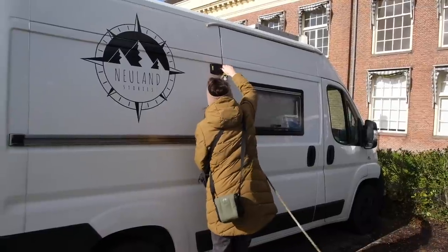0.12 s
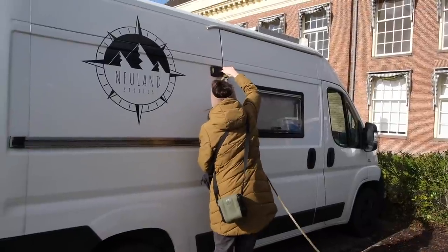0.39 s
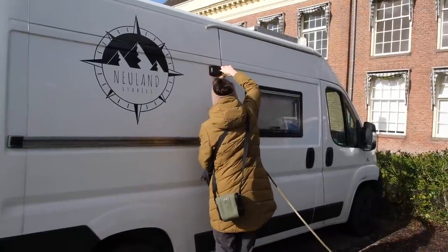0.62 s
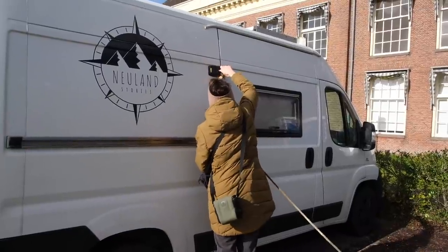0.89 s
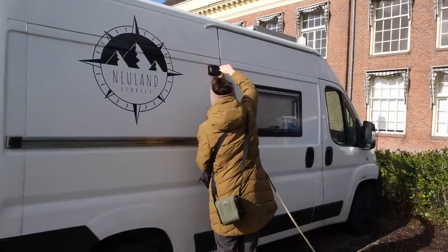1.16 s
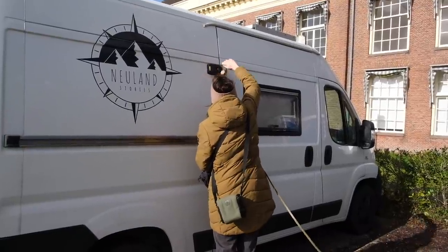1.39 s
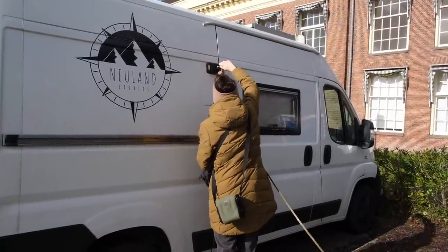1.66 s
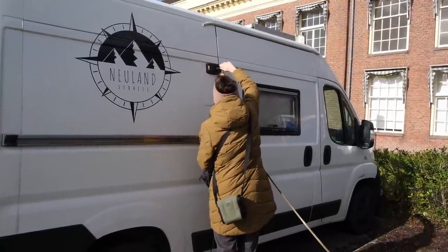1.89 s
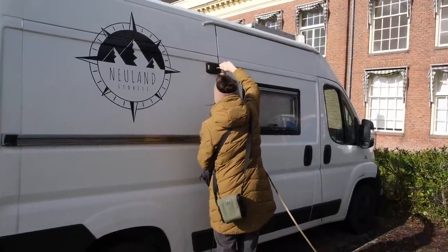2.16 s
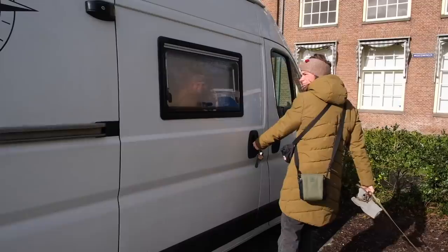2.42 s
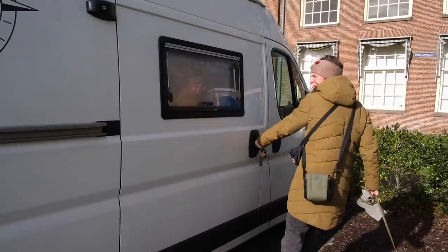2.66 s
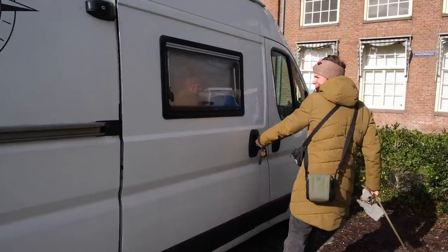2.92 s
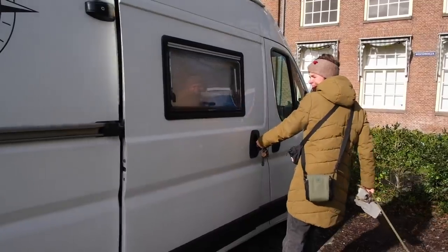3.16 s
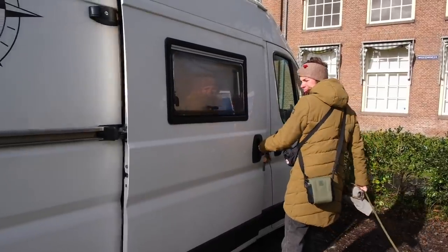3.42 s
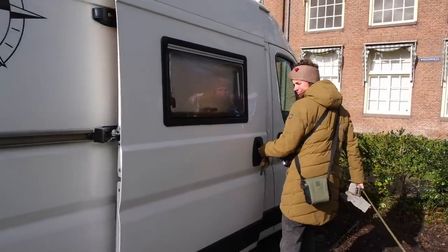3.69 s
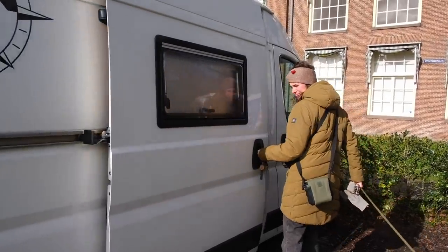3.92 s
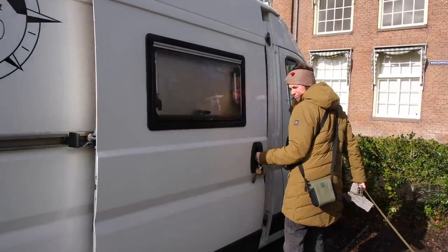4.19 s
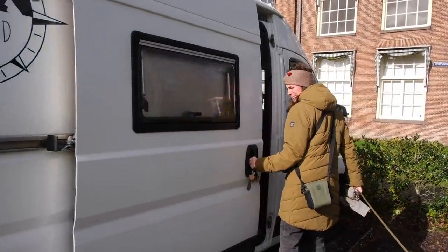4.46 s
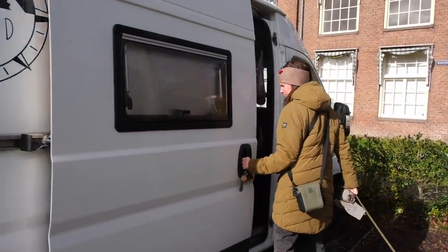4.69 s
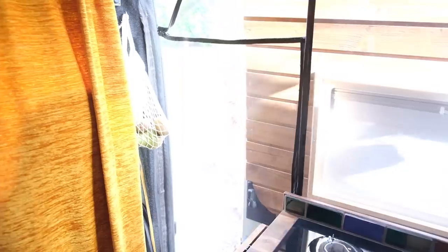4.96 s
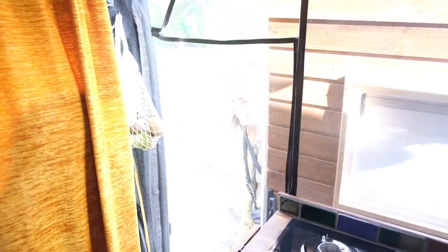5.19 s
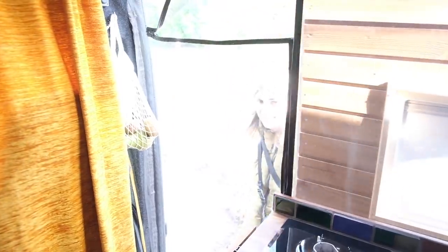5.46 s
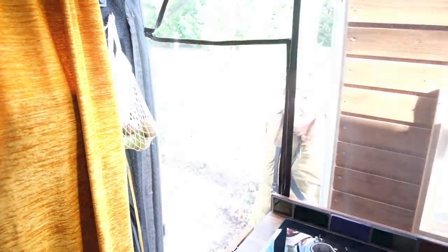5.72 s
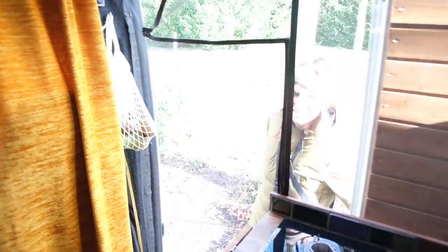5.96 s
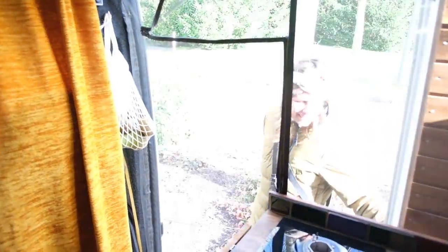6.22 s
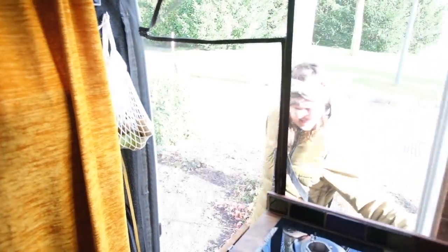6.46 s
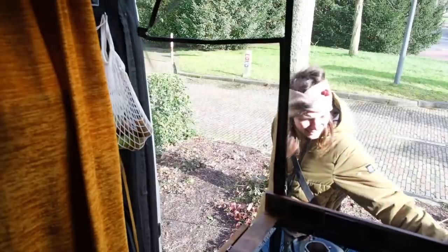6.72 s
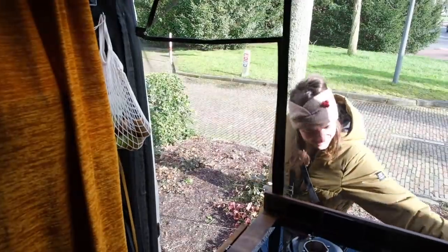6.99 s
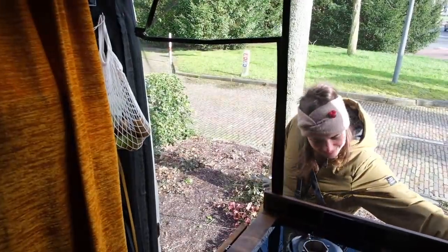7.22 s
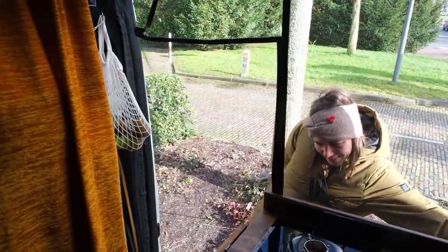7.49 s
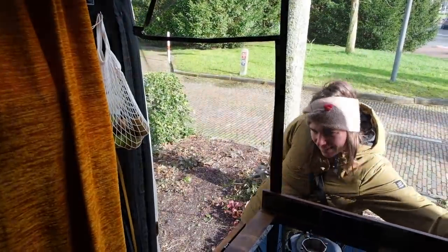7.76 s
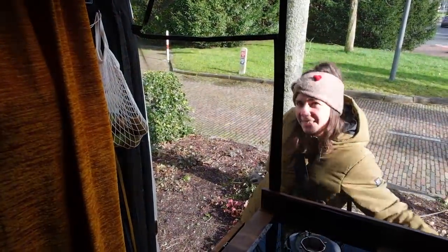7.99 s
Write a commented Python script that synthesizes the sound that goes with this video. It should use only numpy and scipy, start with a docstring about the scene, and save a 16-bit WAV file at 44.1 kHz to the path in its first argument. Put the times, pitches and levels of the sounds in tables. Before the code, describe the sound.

Close, wind-overloaded outdoor sound: low heaves, blunt pops, a buzzing small motor approaching and dry clicks. Abruptly the motor stops, wind continues, and a very sharp van latch cracks with a short rattle and panel thuds. A tiny gap of silence leads to a sheltered interior, where a sliding door rolls with lumpy bass rumble, fades, and ends in clustered rattly knocks, leaving quiet air and cloth rustle.

```python
"""Beside and then inside a camper van. Outside, in two passages, gusts and pops of wind push the microphone;
a small engine, summed from wavering orders, drives by in the first, over a street of coloured noise.
Overload clicks and ringing key modes dot the wind, chirps fall softly, and the sliding door's latch snaps
free as struck modes and rattle. After a short silent join, from inside: the door rolls on its rail as a
low noise, slows and knocks into its end catch, its panel modes driven by blows and rattles."""
import sys
import numpy as np
from scipy import signal
from scipy.fft import rfft, irfft
from scipy.io import wavfile
from scipy.ndimage import uniform_filter1d

SR = 44100
rng = np.random.default_rng(int(sys.argv[2]) if len(sys.argv) > 2 else 0)


def waveform_to_disk(signal):
    """Save audio, clipped to [-1, 1], as 16-bit WAV at the path in sys.argv[1]."""
    frames = np.transpose(np.atleast_2d(signal))
    scaled = np.clip(frames, -1, 1) * 32767
    samples = np.round(scaled).astype(np.int16)
    wavfile.write(sys.argv[1], SR, samples)


def how_loud(loudness_db):
    """Turn decibels into a plain amplitude multiplier (0 dB gives 1, 20 dB gives 10)."""
    steps = np.asarray(loudness_db, float) / 20
    return 10 ** steps


N = 358091
TIME = np.arange(N) / SR
JOIN_S = 2.4245  # second outdoor passage begins
SILENCE_START_S, SILENCE_END_S = 4.9178, 4.9577  # silent join; inside from its end

# Wind on the microphone, first and second passage: t/s, heave level/dB, flutter level/dB
FIRST_WIND = [(0.0, -9, -17.5), (0.1, -33, -42), (0.12, -15.5, -38), (0.27, -14.5, -33), (0.33, -10, -41),
              (0.36, -21.5, -39), (0.5, -22, -37), (0.52, -12, -61), (0.55, -25, -48), (0.79, -21.5, -37),
              (0.81, -36, -51), (0.92, -21, -31), (0.93, -25, -37), (1.08, -29, -31), (1.14, -11, -42),
              (1.29, -15.5, -27), (1.42, -17.5, -27), (1.62, -27, -50), (1.66, -8.5, -27),
              (1.7, -11.5, -48), (1.74, -22.5, -39), (1.78, -28, -39.5), (1.83, -14.5, -34),
              (1.85, -21.5, -48), (1.97, -12.5, -26), (2.04, -21, -35.5), (2.35, -15.5, -33),
              (2.42, -21.5, -29.5)]
SECOND_WIND = [(2.43, -10, -37), (2.46, -21, -33), (2.49, -12, -27.5), (2.54, -23, -36), (2.62, -32, -25),
               (2.64, -18.5, -21), (2.83, -16.5, -33.5), (2.85, -20.5, -25.5), (2.96, -23, -24),
               (3.01, -25.5, -61), (3.03, -28, -41.5), (3.14, -15, -24.5), (3.17, -26.5, -31.5),
               (3.25, -18.5, -20.5), (3.28, -15, -45.5), (3.5, -16, -26.5), (3.57, -22.5, -58),
               (3.62, -17.5, -22.5), (3.64, -17, -40.5), (3.71, -16.5, -34.5), (3.82, -20.5, -47),
               (3.85, -13, -32), (3.91, -14, -46), (3.99, -20, -18.5), (4.05, -12.5, -31), (4.08, -23, -37),
               (4.18, -15, -28.5), (4.22, -23, -40), (4.25, -16.5, -34), (4.31, -24.5, -45.5),
               (4.36, -21, -27.5), (4.41, -16.5, -37), (4.43, -20, -24.5), (4.57, -16, -24),
               (4.67, -23, -36), (4.7, -28, -32), (4.74, -12, -23), (4.79, -23, -28.5), (4.85, -20.5, -19),
               (4.92, -28, -26.5)]
# Sharp wind pops on the diaphragm, before flattening: t/s, peak level/dB, push width/ms
WIND_POPS = [(0.903, 1, 3.24), (1.14, -1, 4.8), (1.204, -8.5, 2.1), (1.324, -5, 1.1), (2.852, -13, 1.4),
             (2.872, -3, 1.9), (2.968, -8, 1.83), (3.118, 0.5, 2.96), (3.863, -10.5, 1.3),
             (4.151, -14, 2.6), (4.186, -2, 1.3), (4.25, -6, 2.4), (4.258, -1, 5.2), (4.452, -6, 1.5),
             (4.474, -5.5, 2.3), (4.527, -6, 2.3), (4.573, -1, 1.7)]
# Passing engine: t/s, firing rate f/Hz, then level/dB of the orders 1, 2, 3, 3.5 and 5
ENGINE_PASS = [(0.0, 154.9, -44.5, -36.5, -58, -65, -60), (0.25, 152.4, -29.5, -40.5, -59, -59, -60),
               (0.42, 146, -32, -37, -66, -63, -49), (0.65, 145.5, -38, -34.5, -37.5, -46, -47),
               (0.85, 142.8, -34, -47.5, -37.5, -42, -47), (1.05, 141.5, -29.5, -47, -39, -42, -42),
               (1.25, 141, -34, -48, -33.5, -45, -44.5), (1.38, 138.2, -29, -45, -41.5, -41, -55),
               (1.5, 141.1, -40, -49, -29, -35, -46.5), (1.7, 142.3, -25, -35, -31.5, -37.5, -47),
               (1.9, 145.6, -24, -35, -30.5, -38, -48.5), (2.07, 147.3, -19, -29.5, -29, -36, -46.5),
               (2.25, 149.5, -28.5, -32.5, -28, -34.5, -46), (2.43, 153.8, -30, -31, -29, -42, -44)]
# Further engine orders: multiple of the firing rate, level/dB re third order
HIGH_ORDERS = [(4, -14.5), (6, -21), (7, -26)]
# Colour of tyre roar and town wash: f/Hz, relative density level/dB
STREET_COLOUR = [(150, -20), (250, 6), (490, 2.5), (870, 0), (960, 4), (1100, 1), (1420, -2), (1870, -7.5),
                 (2700, -12), (3600, -19.5), (4100, -22), (4800, -26.5), (5600, -32.5), (7000, -40.5),
                 (10000, -66), (15800, -56)]
# Faint electronic whine: f/Hz, level/dB when the street stands at -38.5 dB
ELECTRONIC_WHINE = [(10009, -79)]
# Sudden drops of the quieter outdoor sounds: t/s, depth level/dB
LEVEL_DIPS = [(0.318, 6), (1.23, 3), (1.26, 5), (1.3, 9.5), (1.35, 6), (1.668, 6), (2.3, 5), (2.71, 7.5),
              (2.76, 11.5), (2.869, 15.5), (3.13, 12), (3.735, 8), (3.851, 17), (4.26, 12), (4.48, 7.5),
              (4.6, 6)]
# Cloth rustles: centre t/s, length t/s, level/dB
CLOTH_RUSTLES = [(0.157, 0.099, -71), (0.67, 0.13, -76.5), (1.64, 0.061, -71), (2.556, 0.11, -76.5),
                 (3.645, 0.14, -70.5), (5.186, 0.2, -73.5), (5.788, .12, -68.5), (7.573, 0.12, -61.5)]
# Small dry clicks, many from wind overloading the microphone, one at the first join: t/s, peak level/dB
DRY_CLICKS = [(0.3232, -41), (1.283, -46.5), (1.3257, -47), (1.365, -41), (1.6538, -39.5), (2.424, -31.5),
              (2.615, -49), (2.632, -52.5), (2.721, -52), (2.741, -48), (2.754, -54.5), (2.872, -43.5),
              (3.116, -46.5), (3.306, -50), (3.837, -44.5), (3.852, -53.5), (3.863, -49), (4.16, -48),
              (4.186, -54), (4.2583, -44.5), (4.412, -53), (4.4707, -51)]
# High pings, mostly of keys, one in the door's end knock: t/s, level/dB before the soft onset,
# ring f/Hz, t60/s
HIGH_PINGS = [(.50, -63, 13040, .08), (1.316, -49, 8960, 0.023), (1.351, -44, 9140, 0.026),
              (1.356, -53, 9500, 0.084), (2.083, -54, 13100, .03), (2.215, -68, 12790, .15),
              (2.25, -68, 12870, .15), (2.29, -62, 12900, 0.19), (2.33, -65, 13100, 0.16),
              (2.365, -64, 12960, .1), (2.703, -56, 5000, 0.068), (4.018, -63, 10450, .2),
              (4.031, -56, 10450, 0.11), (7.532, -28, 5000, 0.046)]
# Blows on the door: t/s, rattle peak level/dB, loudest mode region f/Hz, spread/octaves,
# blow level/dB re rattle, rattle length/ms
DOOR_KNOCKS = [(0.7336, -21.5, 802, 0.26, 12.5, 8.9), (1.819, -39, 3580, 0.36, 0, 3.9),
               (2.7405, -20.5, 650, 0.88, 1, 11), (2.745, -19.5, 523, 0.99, 10, 14),
               (2.7493, -23.5, 402, 0.55, 10, 27), (3.382, -35, 2150, 0.27, 6, 2),
               (3.382, -24, 615, 0.42, 7.5, 4.6), (3.3865, -27.5, 786, 0.36, 6, 4.5),
               (3.45, -24, 810, 1.3, 2, 7.9), (3.454, -27.5, 746, 0.76, 9, 5.7),
               (5.296, -30, 2520, .86, -6.5, 8.7), (7.4214, -25.5, 1020, 0.24, 7, 5),
               (7.422, -48, 2250, 0.11, 14, 5), (7.430, -24, 694, 0.6, -4, 23),
               (7.529, -9, 1000, 2.04, -13, 24), (7.538, -22, 447, 0.43, 8, 10),
               (7.546, -21.5, 254, 0.65, 9.5, 10.6), (7.549, -14, 900, 1.4, -1, 25),
               (7.572, -23, 1080, .35, 1, 19), (7.600, -28, 300, 0.77, 5, 5),
               (7.652, -30.5, 1000, 0.36, -6, 27), (7.661, -26, 240, 0.45, 6.5, 8)]
# Door modes before the lining damps them: f/Hz, relative level/dB, t60/s
DOOR_MODES = [(241, 8, 0.097), (300, -2, 0.072), (397, 0, 0.084), (480, 8, 0.062), (606, 9.5, 0.081),
              (723, 3, 0.046), (880, 6, 0.046), (1000, 4.5, .05), (1064, 4.5, 0.12), (1205, 12, 0.086),
              (1370, 3.5, 0.1), (1633, 8, 0.018), (1778, -4, 0.045), (2230, -9, 0.036), (2590, -5.5, 0.05),
              (3170, -11.5, .02), (3580, -13, 0.015), (4010, -1, 0.02), (5000, -2, 0.015), (5420, -4, .04),
              (6820, 9, .02), (9100, 10, 0.002), (11400, -3, 0.004)]
# Faint distant chirps: t/s, length t/s, starting f/Hz, level/dB before the flutter
SOFT_CHIRPS = [(1.83, .033, 4750, -56), (1.897, .033, 4850, -62), (1.974, 0.064, 4640, -56),
               (2.04, 0.064, 2890, -42.5), (2.05, .033, 4700, -57), (2.129, 0.061, 4800, -57),
               (2.151, 0.05, 2770, -42), (2.159, 0.086, 2580, -47), (2.166, .05, 4130, -56),
               (2.196, 0.085, 3060, -54)]
# Latch bolt modes: f/Hz, relative level/dB, t60/s (2 ms at least when rung)
BOLT_MODES = [(820, 6, 0.0025), (2080, 2, 0.0051), (2470, -8, 0.0058), (3060, -0.5, 0.01),
              (4800, -3.5, 0.0049), (6300, -8, 0.0016), (8740, -7.5, .0015), (11950, -35.5, .0015)]
# Colour of the rattling lock parts: f/Hz, relative density level/dB
LOCK_RATTLE = [(240, -27), (400, -16), (665, 0.5), (1520, -16), (2170, -20), (2380, -9.5), (2820, -21),
               (5470, -23.5), (8030, -47), (10300, -43), (15800, -56)]
# Inside the van: t/s, door rolling level/dB, air level/dB
CABIN_LEVELS = [(4.96, -22.5, -51.5), (5.6, -20, -50), (6.0, -23, -51), (6.74, -27.5, -51.5),
                (7.15, -34.5, -50.5), (7.53, -33.5, -49.5), (7.77, -40.5, -49.5), (8.12, -43, -49.5)]
# Colour of the door panel shaken by the rollers: f/Hz, relative density level/dB
ROLL_COLOUR = [(35, -40), (60, -9.5), (86, -3.5), (113, -9.5), (140, -1), (213, 3), (247, 1.5), (282, 1.5),
               (423, -13.5), (617, -16), (696, -26.5), (1000, -19.5), (1500, -35.5), (1950, -87),
               (3300, -120)]
# Colour of the outdoor air heard from inside: f/Hz, relative density level/dB
AIR_COLOUR = [(9.4, -33.5), (14, 14.5), (26, -16.5), (44, -14), (166, -21.5), (234, -30), (405, -44),
              (468, -22.5), (606, -31.5), (833, -25), (1210, -27), (1480, -33), (2880, -35.5),
              (5760, -56.5), (15800, -76)]


def column(table, k):
    """Column k of a curve at every sample."""
    points = np.array(table)
    return np.interp(TIME, points[:, 0], points[:, k])


def band(x, lo_hz, hi_hz, order=2):
    """Butterworth band-pass."""
    edges = [lo_hz, min(hi_hz, .45 * SR)]
    return signal.sosfilt(signal.butter(order, edges, "bandpass", fs=SR, output="sos"), x)


def unit(x, lo_hz=10, hi_hz=18000):
    """Scale so that the band lo-hi has rms 1."""
    return x / np.std(band(x, lo_hz, hi_hz))


def walk(rate):
    """Random levels held 1 / rate s and slewed twice; spread near 1."""
    k = int(SR / rate)
    held = np.repeat(rng.standard_normal(N // k + 1), k)
    return 1.025 * uniform_filter1d(uniform_filter1d(held, k), k)[:N]


def wash(spectrum, flicker_db, rate):
    """Noise of a given colour whose octaves each flicker in level."""
    hz = np.fft.rfftfreq(N, 1 / SR) + 1e-3
    table = np.array(spectrum)
    colour_db = np.interp(np.log(hz), np.log(table[:, 0]), table[:, 1])
    full = rfft(rng.standard_normal(N)) * how_loud(colour_db)
    out = 0
    for centre in 2. ** np.arange(4, 15):  # octaves from 16 Hz up, cross-faded
        share = np.cos(np.pi / 2 * np.clip(np.log2(hz / centre), -1, 1)) ** 2
        out = out + irfft(full * share, N) * how_loud(flicker_db * walk(rate))
    return out


def ring(x, hz, t60):
    """One decaying mode excited by x."""
    pole = np.exp(2j * np.pi * hz / SR - np.log(1000) / (max(t60, .002) * SR))
    return signal.lfilter([1], [1, -pole], x).imag


def add(out, s, sound):
    """Mix a sound in at time s."""
    i = int(s * SR)
    out[i:i + len(sound)] += sound[:len(out) - i]


def dip():
    """Level change in dB: the deepest dip under way, dropping at once and climbing back steadily."""
    drop_s, recover_db_per_s = 0.011, 22
    losses = [np.clip(db - recover_db_per_s * (TIME - s), 0, None) * (TIME > s) for s, db in LEVEL_DIPS]
    lost = np.max(losses, axis=0)
    return -uniform_filter1d(lost, int(drop_s * SR)) * (TIME < SILENCE_START_S)


def wind():
    """Eddies push the diaphragm: slow heaves and quicker puffs; the strongest flatten at the input stage."""
    curve = FIRST_WIND + SECOND_WIND
    heave = unit(band(rng.standard_normal(N), 12, 62), 15, 90)
    sway = unit(band(rng.standard_normal(N), 4.86, 20.8), 3, 33)
    heave = (heave + sway) * how_loud(column(curve, 1) + 2.5 * walk(16))  # random gustiness in dB, rate per s
    flutter = unit(band(rng.standard_normal(N), 84.4, 206.5), 49, 490)
    flutter = flutter * how_loud(column(curve, 2) + 4 * walk(25))
    push = pops() + heave + flutter
    ceiling = .53  # of full scale, before the last filter
    flat = ceiling * np.tanh((np.abs(push) / ceiling) ** 3) ** (1 / 3) * np.sign(push)
    return band(flat, 3, 1200)


def engine():
    """Firing harmonics on a slightly unsteady speed, wavering in level; further orders follow the third."""
    rate_hz = column(ENGINE_PASS, 1) * (1 + 0.006 * walk(39.8))
    phase = 2 * np.pi * np.cumsum(rate_hz) / SR
    main = 0
    for col, order in enumerate((1, 2, 3, 3.5, 5), 2):
        main = main + how_loud(column(ENGINE_PASS, col) + 3.5 * walk(30)) * np.sin(order * phase)
    high = sum(how_loud(db + 3.8 * walk(15)) * np.sin(order * phase) for order, db in HIGH_ORDERS)
    high = high * how_loud(column(ENGINE_PASS, 4))  # level of the third order
    return np.sqrt(2) * (main + high) * how_loud(0.99 * dip()) * (TIME < JOIN_S)


def street():
    """Tyre roar and town wash as flickering noise, plus a faint electronic whine that follows its level."""
    before_db, after_db = -38.5, -42.5  # either side of the first join
    pass_s, pass_length_s, pass_db = 2.3, 0.34, 0.5  # roar swells as the vehicle is nearest
    far_treble_db, nearing_s = -4, (0.96, 2.4)  # duller until the vehicle comes near
    swell_db = pass_db * np.exp(-((TIME - pass_s) / pass_length_s) ** 2)
    level_db = np.where(TIME < JOIN_S, before_db, after_db) + dip() + swell_db
    whine = 0
    for hz, db in ELECTRONIC_WHINE:
        whine = whine + how_loud(db + .6 * (level_db - before_db)) * np.sin(2 * np.pi * hz * TIME)
    roar = unit(wash(STREET_COLOUR, 1.2, 9), 1200, 4000)
    treble = band(roar, 2700, 9000, order=1)
    roar = roar + treble * (how_loud(np.interp(TIME, nearing_s, [far_treble_db, 0])) - 1)
    return roar * how_loud(level_db) + whine


def rustle():
    """Fine treble noise, grainy like rubbed fabric: steady air plus swells of cloth, added as power."""
    hiss_db = np.array((-71.5, -69, -74))  # treble air in the three passages
    passage = np.searchsorted([JOIN_S, SILENCE_END_S], TIME)
    air_db = hiss_db[passage] + 0.89 * dip()
    cloth = sum(how_loud(db) ** 2 * np.exp(-((TIME - s) / length) ** 2) for s, length, db in CLOTH_RUSTLES)
    grain = rng.standard_normal(N) * how_loud(1.7 * walk(150))
    fine = unit(band(grain, 5500, 15500), 6500, 14000)
    return fine * np.sqrt(how_loud(air_db) ** 2 + cloth)


def clicks_and_pings():
    """Wide sharp clicks of decaying noise, and single high modes left ringing after a soft onset."""
    out, t = np.zeros(N), TIME[:int(.2 * SR)]
    # seven faint clicks fall at random outdoors, -55 to -49 dB
    faint = [(u * SILENCE_START_S, -55 + 6 * v) for u, v in rng.random((7, 2))]
    for s, db in DRY_CLICKS + faint:
        click = band(rng.standard_normal(len(t)) * np.exp(-t / 0.0016), 2800, 10000, order=1)
        add(out, s, how_loud(db) * click / np.abs(click).max())
    impulse, onset = 1. * (t == 0), np.minimum(t / 0.0016, 1)
    for s, db, hz, t60 in HIGH_PINGS:
        add(out, s, how_loud(db) * onset * ring(impulse, hz, t60))
    return out


def knocks():
    """A clean blow and a rattle that builds and dies drive the damped door modes near the struck place."""
    rise_share = 0.12  # the rattle builds over this share of its length
    ring_share = .75  # lining damps the listed rings
    crunch_db = -5  # re modes
    out, t = np.zeros(N), TIME[:int(.16 * SR)]
    for s, db, hz, octaves, blow_db, rattle_ms in DOOR_KNOCKS:
        x = t * 1000 / rattle_ms
        rattle = rng.standard_normal(len(t)) * np.minimum(x / rise_share, 1) * np.exp(-x ** 2)
        push = np.exp(-((t * hz - 1) / .17) ** 2)  # contact lasts about a third of a cycle
        body, blow = 0, 0
        for f, mode_db, t60 in DOOR_MODES:
            distance = np.log2(f / hz) / octaves
            gain = how_loud(mode_db - 11.0 * distance ** 2) / np.sqrt(t60)
            body = body + gain * ring(rattle, f, ring_share * t60)
            blow = blow + gain * ring(push, f, ring_share * t60)
        # many weak panel modes blur into noise
        crunch = band(rattle, hz / 2 ** octaves, hz * np.sqrt(2) ** octaves)
        body = body / np.abs(body).max() + how_loud(crunch_db) * crunch / np.abs(crunch).max()
        body = band(body, 60, hz * 4 ** (octaves + .6))
        knock = body / np.abs(body).max() + how_loud(blow_db) * blow / np.abs(blow).max()
        add(out, s, how_loud(db) * knock)
    return out


def pops():
    """A single eddy hitting the port: a draw-in, a pointed push and a swing back."""
    out, t = np.zeros(N), TIME[:int(.06 * SR)]
    for s, db, push_ms in WIND_POPS:
        x = t * 1000 / push_ms - 6  # in push widths from the point
        push = np.exp(-1.5 * (np.hypot(x, .2) - .2))
        swing = 0.18 * np.exp(-((x + 2.43) / 1.3) ** 2) + 0.21 * np.exp(-((x - 2.8) / 1.1) ** 2)
        add(out, s - 6 * push_ms / 1000, how_loud(db) * (push - swing))
    return out


def chirps():
    """Short soft falling whistles, perhaps a far bird, with a rough flutter in level."""
    out = np.zeros(N)
    for s, length, hz, db in SOFT_CHIRPS:
        fall = np.linspace(1, 1 - 0.042, int(length * SR))  # share of the pitch lost
        whistle = np.sin(2 * np.pi * np.cumsum(hz * fall) / SR)
        add(out, s, how_loud(db) * np.hanning(len(fall)) * whistle)
    return out * (1 + 0.32 * walk(170))


def latch():
    """The bolt strikes three times within two milliseconds, then the lock parts give a dense dry rattle."""
    latch_s, crack_db, rattle_db = 2.6692, 4, -21  # rattle re crack
    out, t = np.zeros(N), TIME[:int(.08 * SR)]
    strikes = [(.0004, .8), (.0008, -1), (.0015, 1)]  # t/s, push
    strike = sum(g * np.exp(-((t - s) / .00004) ** 2) for s, g in strikes)
    crack = sum(how_loud(db) * ring(strike, hz, t60) for hz, db, t60 in BOLT_MODES)
    envelope = np.minimum(t / 0.0038, 1) ** 2 * np.exp(-(t / 0.014) ** 3)
    rattle = unit(wash(LOCK_RATTLE, 0., 9)[:len(t)]) * envelope
    snap = crack / np.abs(crack).max() + how_loud(rattle_db) * rattle
    add(out, latch_s - .001, how_loud(crack_db) * snap)
    return out


def cabin():
    """Rollers rumble through the door panel in lumps; quiet outdoor air comes in through the opening."""
    roll = unit(wash(ROLL_COLOUR, 0.22, 22), 57, 730) * how_loud(column(CABIN_LEVELS, 1))
    air = unit(wash(AIR_COLOUR, 0.65, 8.1), 1730, 4500) * how_loud(column(CABIN_LEVELS, 2))
    return roll + air


def scene():
    """Outside until the silent join, entered by a quick fade and left with a step; inside after it."""
    outside = wind() + engine() + street() + chirps()
    background = np.where(TIME < SILENCE_START_S, outside, cabin()) + rustle()
    fade_out = np.clip((SILENCE_START_S - TIME) / 0.0012, 0, 1)
    since_end = TIME - SILENCE_END_S
    fade_in = np.clip(since_end / 0.002, 0, 1)
    step = how_loud(-15.5) * (since_end > 0) * np.exp(-np.abs(since_end) / 0.0016)
    events = latch() + knocks() + clicks_and_pings()
    return (background * (fade_out + fade_in) + step + events)[None]


def roll_off(x):
    """The treble ends steeply here."""
    return signal.sosfilt(signal.butter(12, 16260, fs=SR, output="sos"), x)


def record(dry):
    """Clips the peaks at full scale to finish the mix."""
    mix = np.clip(dry, -1, 1)
    return roll_off(mix)


dry = scene()
out = record(dry)
waveform_to_disk(out)
```